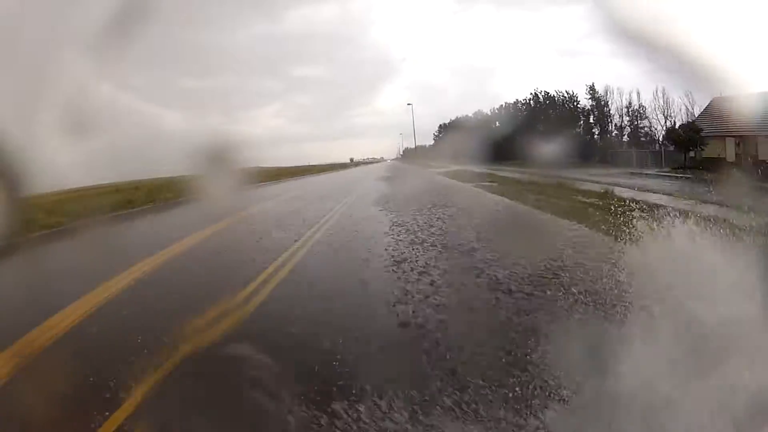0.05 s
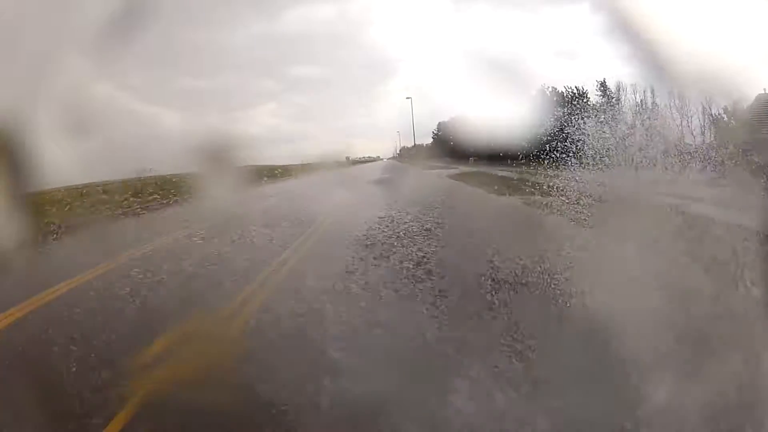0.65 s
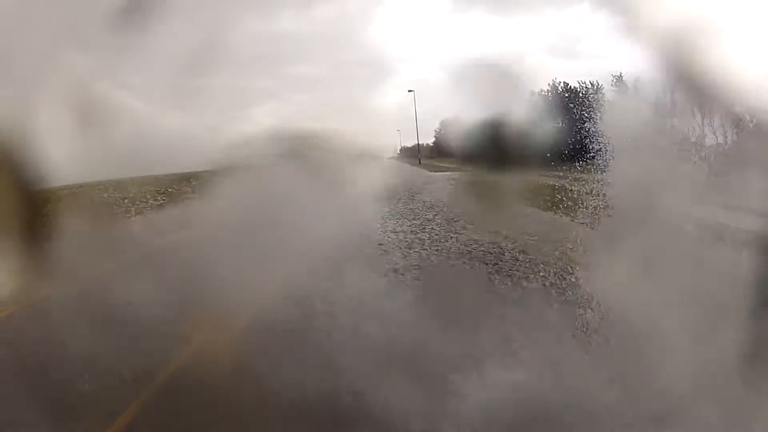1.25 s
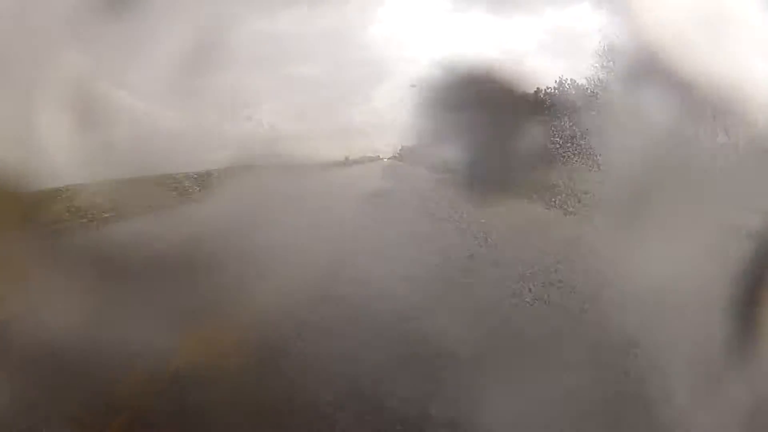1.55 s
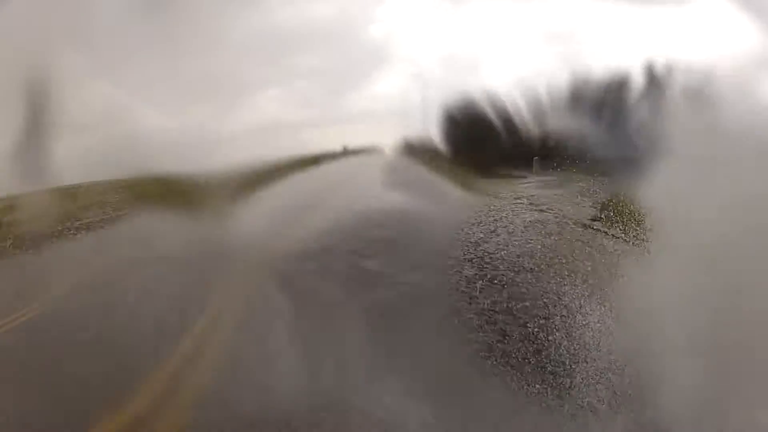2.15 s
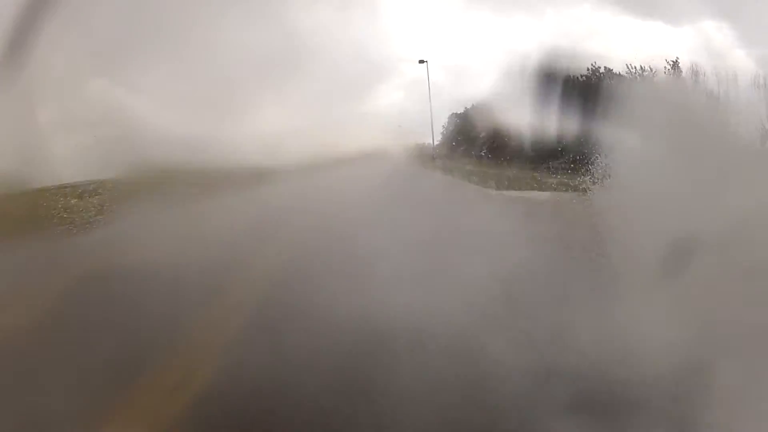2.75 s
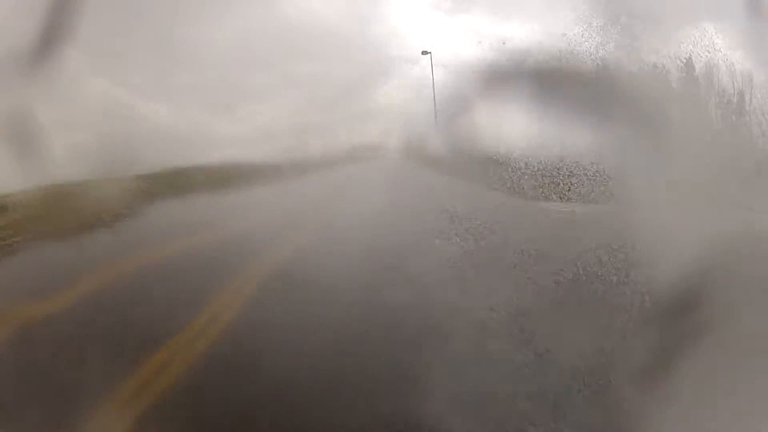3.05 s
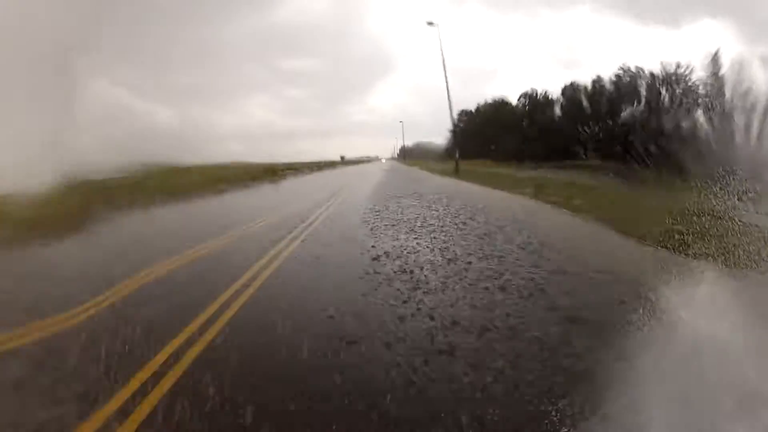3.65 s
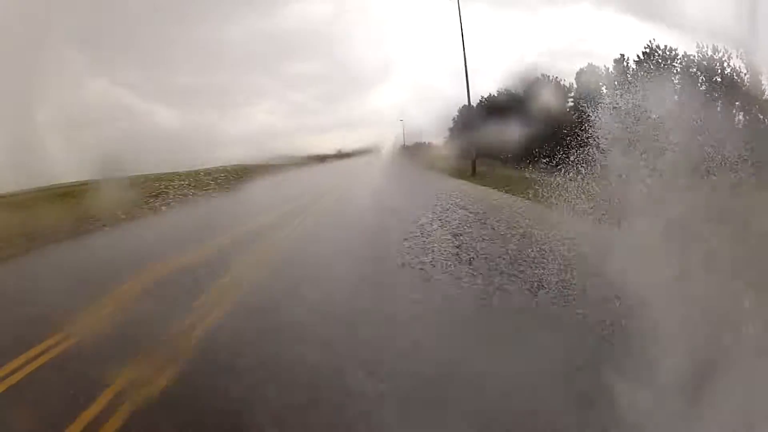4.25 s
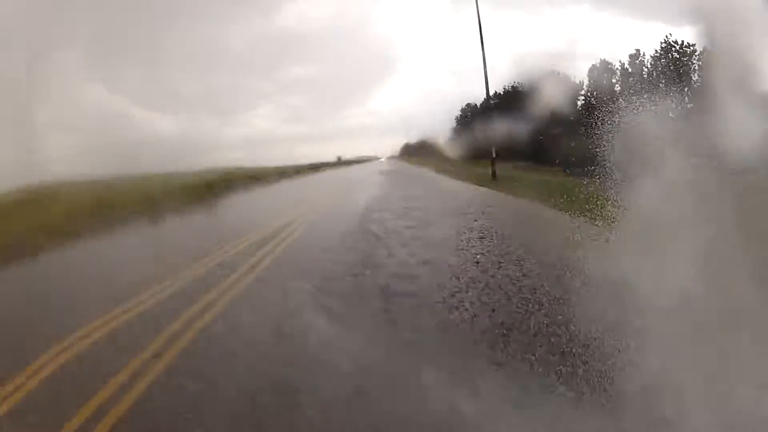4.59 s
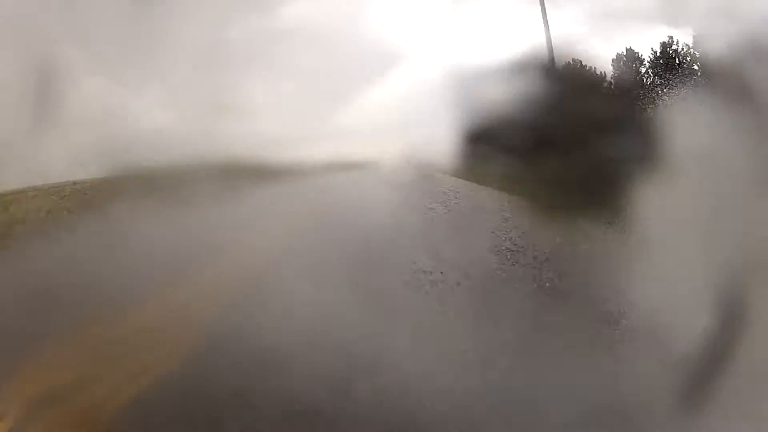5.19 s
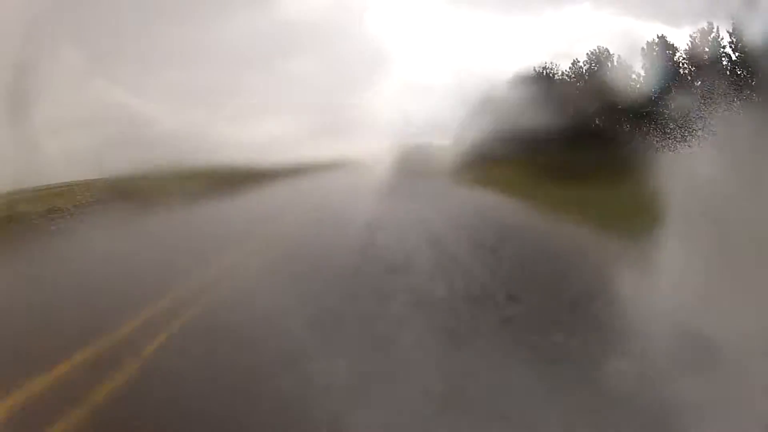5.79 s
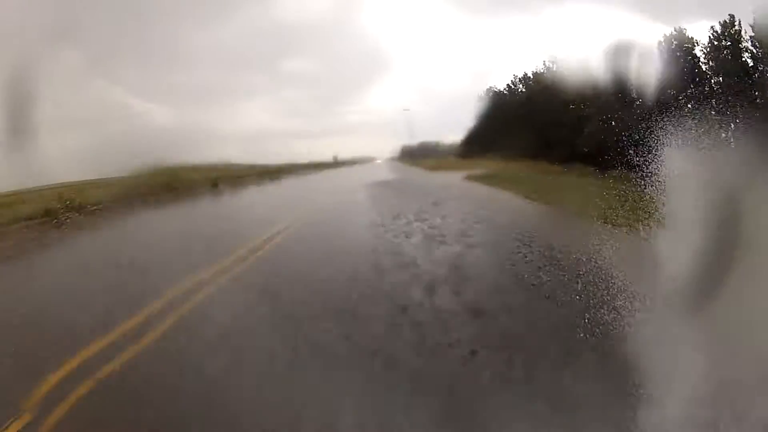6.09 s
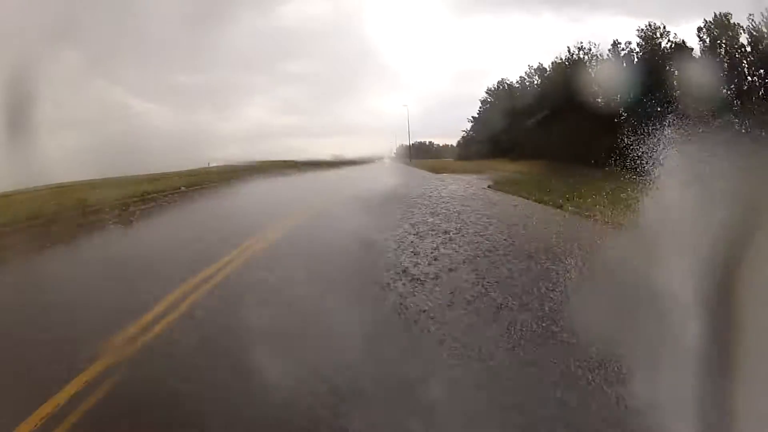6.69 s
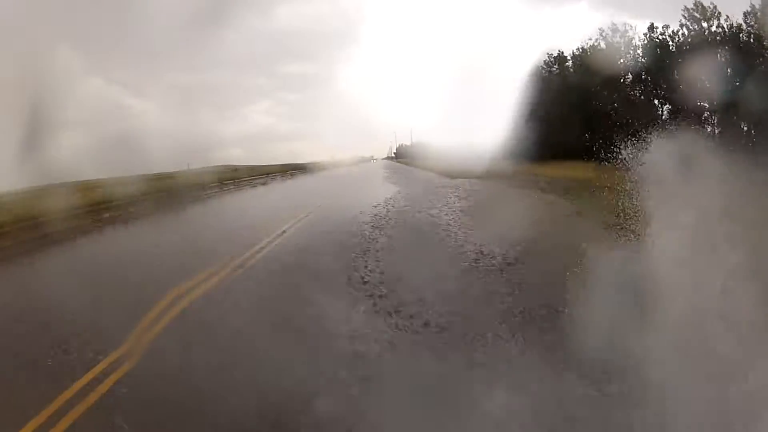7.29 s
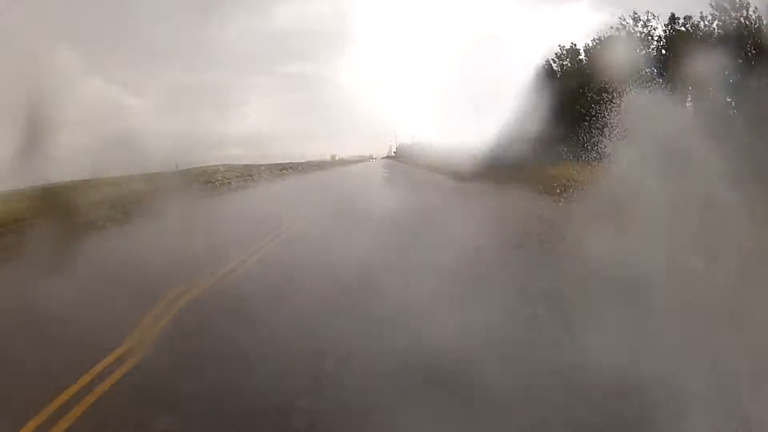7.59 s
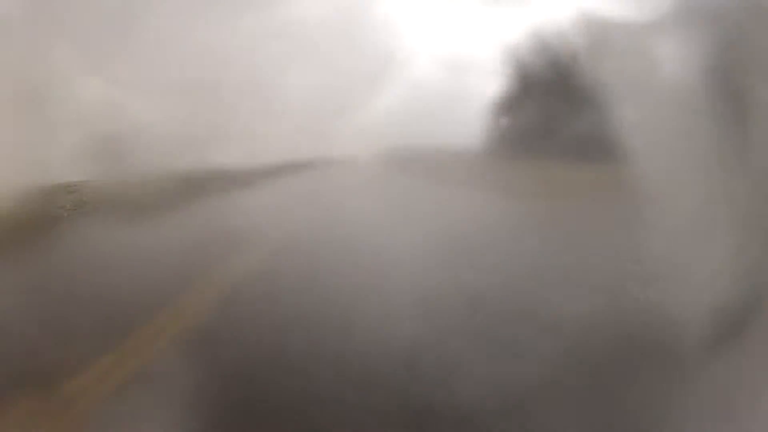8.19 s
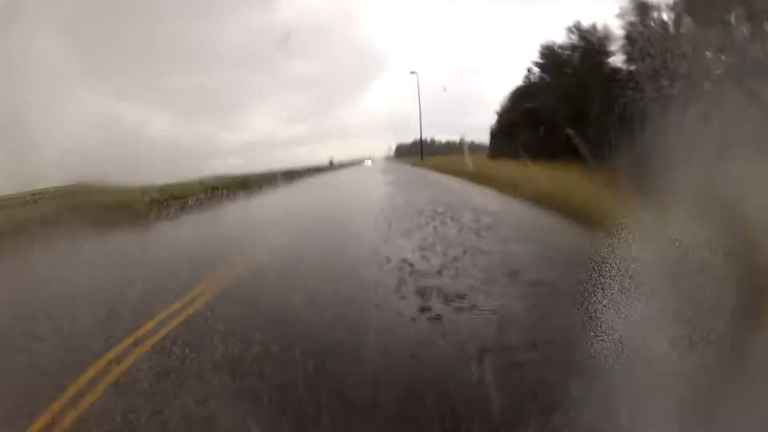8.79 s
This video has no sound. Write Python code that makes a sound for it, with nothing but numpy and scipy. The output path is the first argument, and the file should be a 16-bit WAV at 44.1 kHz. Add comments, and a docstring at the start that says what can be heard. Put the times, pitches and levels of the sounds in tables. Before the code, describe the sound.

Tyre spray rushes and crackles against a camera while water drops tap and slap it, over a low wind and road rumble.

```python
"""Driving through floodwater

A vehicle drives along a flooded road with a camera in a sealed housing mounted outside.
Tyre spray rushes and patters on the housing, slaps of water and single drops knock on it,
pockets of water gulp as they slide off, and the mount rumbles in the wind.
The hardest drops drive a limiter, which ducks the rush for a moment after each."""
import sys
import numpy as np
from scipy import signal
from scipy.fft import rfft, irfft, next_fast_len
from scipy.io import wavfile
from scipy.ndimage import uniform_filter1d

SR = 44100
rng = np.random.default_rng(int(sys.argv[2]) if len(sys.argv) > 2 else 0)


def to_wav(sig):
    """Store sig (one row per channel, or 1-D mono) as 16-bit WAV at the path in sys.argv[1].

    Samples outside -1..1 are clipped; the rate is SR.
    """
    pcm = np.clip(np.atleast_2d(sig), -1, 1) * 32767
    pcm = np.round(pcm).astype(np.int16)
    wavfile.write(sys.argv[1], SR, pcm.T)  # frames by channels


N = 398652


def amp(db):
    """Decibels to gain."""
    return 10 ** (np.asarray(db) / 20)


def unit(x):
    """Scales to rms 1."""
    return x / np.sqrt(np.mean(x ** 2) + 1e-20)


def curve(rows):
    """Draws an automation curve through (time_s, value) points."""
    return np.interp(np.arange(N) / SR, *np.transpose(rows))


def add(mix, start_s, sound):
    """Lays a sound into the mix."""
    part = mix[max(round(start_s * SR), 0):][:len(sound)]
    part += sound[:len(part)]


def noise(gain):
    """Noise of rms 1 whose spectrum is gain(hz)."""
    n = next_fast_len(N)
    spectrum = rfft(rng.standard_normal(n)) * gain(np.fft.rfftfreq(n, 1 / SR))
    return unit(irfft(spectrum, n)[:N])


def wander(rate_hz):
    """Smooth random drift of rms 1, rolling off above rate_hz."""
    return noise(lambda hz: np.exp(-(hz / rate_hz) ** 2))


def patter(per_s, spread_db):
    """A train of tiny impacts, mostly small, a few large."""
    size = amp(spread_db * np.minimum(rng.exponential(1, N), 4))
    return size * rng.choice([-1, 1], N) * (rng.random(N) < per_s / SR)


def response(hz, modes, base):
    """Gain curve: resonant peaks over a smooth base."""
    base_hz, base_db = np.transpose(base)
    floor = amp(np.interp(np.log(hz + 1), np.log(base_hz), base_db))
    peaks = [amp(db) / (1 + 2 * ((hz - pitch_hz) / width_hz) ** 2) for pitch_hz, width_hz, db in modes]
    return np.sqrt(floor ** 2 + sum(peak ** 2 for peak in peaks))


# Resonances of the housing: pitch_hz, width_hz, level_db
HOUSING_MODES = [(1021, 145, 1.5), (1763, 270, 0.5), (2322, 250, 4), (3540, 308, -2), (8406, 162, -6),
                 (9670, 136, -5), (9980, 190, -9.5), (14100, 500, -28), (14480, 156, -2)]
# Tone colour of the water sounds between the resonances, with dips near 6 and 12 kHz:
# frequency_hz, gain_db
WATER_TONE_EQ = [(60, -38), (230, -16.5), (350, -17), (500, -7.5), (720, -16), (1300, -5), (3000, -15),
                 (4900, -16.5), (5950, -31), (7000, -19), (11000, -16.5), (12000, -67), (13100, -14),
                 (15000, -37)]


def housing_ring(damping=1, detune=1, top_hz=14700, size=4096):
    """The housing's ring after one tap; a film of water damps and detunes its resonances."""
    hz = abs(np.fft.fftfreq(size, 1 / SR))
    modes = [(pitch_hz * detune, width_hz * damping, db - 10 * np.log10(damping))
             for pitch_hz, width_hz, db in HOUSING_MODES]
    gain = response(hz, modes, WATER_TONE_EQ) / (1 + (hz / top_hz) ** 50)
    minimum_phase = np.exp(np.conj(signal.hilbert(np.log(gain + 1e-5))))
    ring = np.fft.ifft(minimum_phase).real[:size // 2]
    return ring / np.linalg.norm(ring)


def wet_housing(force, damping=1, detunes=(.988, 1, 1.012)):
    """Water sliding over the housing keeps shifting its resonances a little."""
    shares = np.array([amp(8 * wander(rate_hz=30)) for _ in detunes])
    shares /= np.linalg.norm(shares, axis=0)  # equal-power crossfade between tunings
    return sum(signal.oaconvolve(force * share, housing_ring(damping, detune))[:N]
               for share, detune in zip(shares, detunes))


# How hard the spray hits as the water deepens and shallows: time_s, level_db
SPRAY_LEVEL = [(0, -33), (1.1, -31), (1.6, -32.5), (2.2, -31), (2.7, -31.5), (3.0, -37), (3.55, -27),
               (3.68, -36.5), (4.3, -33.5), (5.9, -33), (6.33, -35), (6.52, -32), (6.9, -32.5),
               (7.28, -38.5), (7.7, -33), (8.52, -34), (8.73, -30.5), (9.04, -39)]


def spray():
    """A soft wash, a crackle of tiny impacts and coarse droplets all sound through the housing."""
    level_db = curve(SPRAY_LEVEL)
    wash = unit(rng.standard_normal(N) * amp(2 * wander(rate_hz=38)))
    crackle = unit(patter(per_s=1100, spread_db=3.5) * amp(2 * wander(rate_hz=70)))
    coarse = droplets(surge_db=level_db - level_db.mean())
    blend = amp(-5.5) * wash + amp(-10.5) * crackle + amp(-10) * coarse
    return wet_housing(amp(level_db) * blend)


def droplets(surge_db, sizes=10, decay_cycles=0.68):
    """Coarse droplets land in clumps; each size of droplet gives a short pip of its own pitch."""
    out, t = np.zeros(N), np.arange(int(.006 * SR)) / SR
    clumps = amp(2.8 * wander(rate_hz=13) + 0.038 * surge_db)
    for pitch_hz in np.geomspace(800, 4200, sizes):
        pip = np.cos(2 * np.pi * pitch_hz * t) * np.exp(-pitch_hz * t / decay_cycles)
        out += np.convolve(patter(per_s=40, spread_db=2.8) * clumps, unit(pip))[:N]
    return unit(out)


# Big drops on the housing, ring and thud set against the splat:
# start_s, peak_db, pitch_hz, ring_db, thud_db
BIG_DROPS = [(0.1092, 4.5, 2140, -5, -23), (0.252, -4, 2000, -12, -27), (0.3513, -7.5, 2300, 23, -21),
             (0.4, 4, 1070, -2, -12), (0.4362, 14.5, 1325, -3, -22), (0.5264, -1.5, 2200, 1, -27),
             (0.5885, 6.5, 1064, -4, -22), (0.632, -5.5, 1020, 6.5, -13), (0.7444, -6, 2650, -5, -28),
             (0.813, 5, 2300, 0, -14), (1.033, 4.5, 2270, -4, -10.5), (1.1669, 12, 1100, -2, -5.5),
             (1.4604, 0.5, 2430, -4, -26), (1.5512, -3, 1080, -9, -26), (1.632, -8, 1800, -10, -27),
             (1.768, -11, 2010, -1, -8), (1.984, -10.5, 1130, -6.5, -18), (2.0572, -3.5, 2230, -13, -20),
             (2.0656, 12.5, 2150, -32, -8.5), (2.1408, -6.5, 2290, -7, -19), (2.223, -5.5, 2260, -6, -29),
             (2.3854, 19.5, 1100, 6.5, -6), (2.4233, 0.5, 1090, -16, -27), (2.627, -5.5, 1020, -7, -2),
             (3.113, -7.5, 1600, 2, -21), (3.1828, -10, 1620, 1, -24), (3.3267, 9.5, 1116, -1, -17),
             (3.347, -5, 2240, 0, -24), (3.4315, -4.5, 1170, 1, -30), (3.6432, -1.5, 1100, -4.5, -32),
             (3.685, -2, 3600, 1, -11), (3.8363, 2, 2400, 0, -29), (3.9665, -8, 2270, 0.5, -25),
             (4.1749, -6, 2370, 1.5, -22), (4.5318, -13, 2320, -7, -7), (4.5682, -2.5, 1800, -16, -9),
             (4.629, -7.5, 2290, -1, -26), (4.6687, -8, 1000, -4, -21), (5.1753, -10, 1450, -4, -13),
             (5.6483, -7, 1110, -26, -22), (5.8413, -5, 1050, -10, -30), (6.1738, 3.5, 1100, -7.5, -16),
             (6.332, -11, 1880, -3, -30), (6.4234, -2, 1580, 6, -28), (6.558, -7, 1880, 8, -9),
             (6.8054, 11, 1330, -5.5, -8.5), (7.0907, 5.5, 1850, -10, -11.5),
             (7.288, -2.5, 1950, -1.5, -1.5), (7.7341, -5, 2130, 0, -18.5), (8.2675, -7, 1080, -2, -12),
             (8.7351, -9.5, 1110, -1, -11)]


def drops(ring, snap_db=-15.5, thud_hz=275, size=2048):
    """A drop snaps against the housing, spreads, rings the spot it hits and pushes the whole wall in."""
    splat_t60_s, snap_t60_s, tone_t60_s, thud_t60_s = .0057, .0011, .012, .0044
    out, t = np.zeros(N), np.arange(size) / SR
    snap_band = signal.butter(2, [3200, 5200], "band", fs=SR)
    for start_s, peak_db, pitch_hz, ring_db, thud_db in BIG_DROPS + small_drops():
        contact_s = .0014 * amp(.56 * peak_db)  # a bigger drop presses for longer
        press = np.sqrt(np.clip(t / contact_s, .3, 1))
        tail_s = np.maximum(t - contact_s, 0)
        burst, crack = rng.standard_normal((2, size)) * press
        splat = signal.fftconvolve(burst * amp(-60 * tail_s / splat_t60_s), ring)[:size]
        snap = signal.lfilter(*snap_band, crack * amp(-60 * tail_s / snap_t60_s))
        tone = np.sin(2 * np.pi * pitch_hz * t) * press * amp(-60 * tail_s / tone_t60_s)
        thud = np.sin(2 * np.pi * thud_hz * t) * amp(-60 * tail_s / thud_t60_s)
        body = amp(ring_db) * unit(tone) + amp(thud_db) * unit(thud)
        hit = unit(splat) + amp(snap_db) * unit(snap) + body
        add(out, start_s, amp(peak_db) * hit / abs(hit).max())
    return out


def small_drops(count=36, peak_db=-13.5, spread_db=1, ring_db=-9.5, thud_db=-16):
    """Scattered cues like BIG_DROPS, each tuned to one of the housing's three lowest resonances."""
    when, size, spot = rng.random((count, 3)).T
    starts_s = (np.arange(count) + when) / count * N / SR
    peaks_db = peak_db + spread_db * (2 * size - 1)
    pitches_hz = [HOUSING_MODES[int(mode)][0] for mode in 3 * spot]
    return [(*cue, ring_db, thud_db) for cue in zip(starts_s, peaks_db, pitches_hz)]


# Heavy slaps of thrown water: start_s, level_db, fade_s
HEAVY_SLAPS = [(0.01, -25.5, 0.066), (0.222, -23, 0.03), (0.349, -16, 0.011), (0.407, -23, 0.025),
               (0.561, -23, 0.039), (0.629, -14.5, 0.011), (0.81, -21, 0.022), (0.912, -21, 0.023),
               (1.008, -26, 0.066), (1.228, -16, 0.037), (1.323, -20, 0.025), (1.487, -21.5, 0.044),
               (1.846, -27, 0.021), (2.255, -18, 0.011), (2.675, -16.5, 0.015), (2.727, -21.5, 0.031),
               (3, -23.5, 0.017), (3.812, -24.5, 0.025), (4.173, -23, 0.023), (4.25, -19.5, 0.016),
               (4.403, -24.5, 0.015), (4.661, -23.5, 0.022), (5.846, -24, 0.0074), (5.929, -25, 0.038),
               (6.5557, -20.5, 0.019), (7.066, -18, 0.01), (7.37, -26, 0.048), (7.56, -25.5, .022),
               (7.617, -23.5, 0.014), (7.657, -24.5, 0.02), (7.964, -26, .01), (8.698, -22.5, .017)]


def slaps(ring, attack_s=.001, fade_db=14, dull_hz=2000, soft_db=-8):
    """Each slap is a dying burst of impacts; the soft mass of water makes it duller than the mist."""
    impacts = unit(patter(per_s=4000, spread_db=3))
    soft_mass = noise(lambda hz: np.exp(-(hz / dull_hz) ** 2))
    grain = unit(impacts + amp(soft_db) * soft_mass)
    envelope = np.zeros(N)
    for start_s, level_db, fade_s in HEAVY_SLAPS + light_slaps():
        t = np.arange(int(2 * fade_s * SR)) / SR
        attack = 1 - np.exp(-t / attack_s)
        add(envelope, start_s, attack * amp(level_db - fade_db * (t / fade_s) ** 2))
    return signal.oaconvolve(envelope * grain, ring)[:N]


def light_slaps(count=22, level_db=-29, spread_db=8, mean_fade_s=.022):
    """Lighter cues like HEAVY_SLAPS, scattered over the whole drive."""
    when, size, length = rng.random((count, 3)).T
    starts_s = (np.arange(count) + when) / count * N / SR
    levels_db = level_db + spread_db * (2 * size - 1)
    return list(zip(starts_s, levels_db, mean_fade_s * (.5 + length)))


# Fine mist, balanced against the spray: time_s, offset_db
MIST_BALANCE = [(0, -11), (.7, -23), (1.9, -4), (2.3, -12), (2.7, -5.5), (3.5, -7), (3.9, -14.5), (5.6, -2),
                (6.5, -14.5), (7.4, -12), (7.8, -7.5), (8.7, -6.5), (9.04, -26)]


def mist(low_cut_hz=3000):
    """Fine mist sheets over the wet housing as a bright, grainy hiss."""
    fizz = unit(patter(per_s=4200, spread_db=4.0) * amp(1.6 * wander(rate_hz=64)))
    low_cut = signal.butter(2, low_cut_hz, "high", fs=SR)
    hiss = unit(signal.lfilter(*low_cut, wet_housing(fizz, damping=0.98)))
    return amp(curve(SPRAY_LEVEL) + curve(MIST_BALANCE)) * hiss


# Pockets of water that gulp as they slide off: start_s, level_db, from_hz, to_hz, length_s
WATER_POCKETS = [(1.239, -25, 760, 530, 0.031), (2.726, -33, 629, 556, 0.043),
                 (5.839, -20, 1110, 1070, 0.017), (6.556, -20, 1003, 904, 0.017),
                 (6.557, -24.5, 694, 533, 0.032), (6.584, -29, 520, 433, 0.025)]


def gulps(churn_hz=220):
    """A trapped pocket rings roughly and sinks in pitch as it opens."""
    out = np.zeros(N)
    churn = wander(rate_hz=churn_hz)
    for start_s, level_db, from_hz, to_hz, length_s in WATER_POCKETS:
        glide_hz = np.geomspace(from_hz, to_hz, int(length_s * SR))
        tone = np.sin(2 * np.pi * np.cumsum(glide_hz) / SR)
        swirl = unit(tone * churn[int(start_s * SR):][:len(tone)])
        add(out, start_s, amp(level_db) * signal.windows.hann(len(tone)) * swirl)
    return out


# How hard the wind shakes the mount: time_s, level_db
WIND_LEVEL = [(0, -37), (1.15, -36), (1.3, -25), (1.55, -30), (1.9, -32.5), (2.5, -42.5), (3.1, -34),
              (4.05, -42), (4.3, -30), (4.65, -40.5), (5.55, -33.5), (7.1, -40.5), (7.45, -34.5),
              (9.04, -40)]
# How hard the road shakes the bodywork: time_s, level_db
ROAD_LEVEL = [(0, -26.5), (.12, -35), (.75, -31.5), (1.2, -35.5), (2.2, -32.5), (3.6, -37.5), (4.2, -35.5),
              (6.2, -36.5), (7.2, -37.5), (7.75, -33.5), (9.04, -38)]
# Resonances of the mount and bodywork: pitch_hz, width_hz, level_db
MOUNT_MODES = [(66.8, 7.5, 2), (93, 22, -7), (120, 13.4, 0.5), (171.4, 47.4, 1), (184.9, 12.7, 1.5)]
# Road roar under them: frequency_hz, gain_db
ROAD_EQ = [(10, -40), (30, 4), (48, -28), (90, -20), (215, -23), (270, -21), (450, -15), (900, -19),
           (3000, -67)]


def rumble(sway_hz=29.5, sway_width_hz=6.5, gust_db=3.5):
    """Wind sways the camera on its mount in gusts while the road shakes the bodywork."""
    sway = noise(lambda hz: np.exp(-((hz - sway_hz) / sway_width_hz) ** 2))
    sway = unit(sway / np.sqrt(abs(signal.hilbert(sway)) ** 2 + 2))  # the mount's swing is bounded
    road = noise(lambda hz: response(hz, MOUNT_MODES, ROAD_EQ))
    gusts = amp(curve(WIND_LEVEL) + gust_db * wander(rate_hz=2.6))
    return gusts * sway + amp(curve(ROAD_LEVEL)) * road


def scene():
    """The mono mix inside the housing; a mass of water damps the wall that it hits."""
    damped_ring = housing_ring(damping=1.3)
    return (spray() + mist() + slaps(damped_ring) + gulps() + drops(damped_ring) + rumble())[None]


def record(dry, threshold_db=-2.0, release_db_per_s=100, ceiling=.75, high_cut_hz=16400):
    """A limiter grabs each hard hit and lets go slowly, followed by a soft clipper and a high cut."""
    over_db = np.maximum(20 * np.log10(abs(dry[0]) + 1e-9) - threshold_db, 0)
    release_db = np.arange(N) / SR * release_db_per_s
    duck_db = np.maximum.accumulate(over_db + release_db) - release_db
    limited = dry / amp(uniform_filter1d(duck_db, size=24))
    clipped = limited / (1 + (limited / ceiling) ** 8) ** (1 / 8)
    high_cut = signal.firwin(511, high_cut_hz, window=("kaiser", 9), fs=SR)
    return signal.oaconvolve(clipped, high_cut[None], "same")


dry = scene()
out = record(dry)
to_wav(out)
```